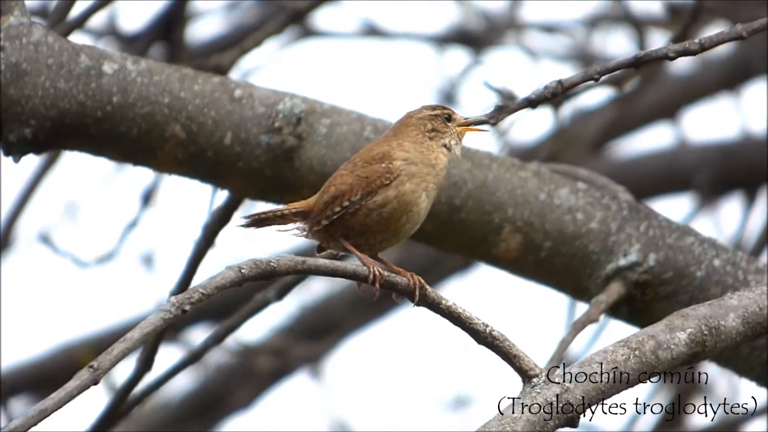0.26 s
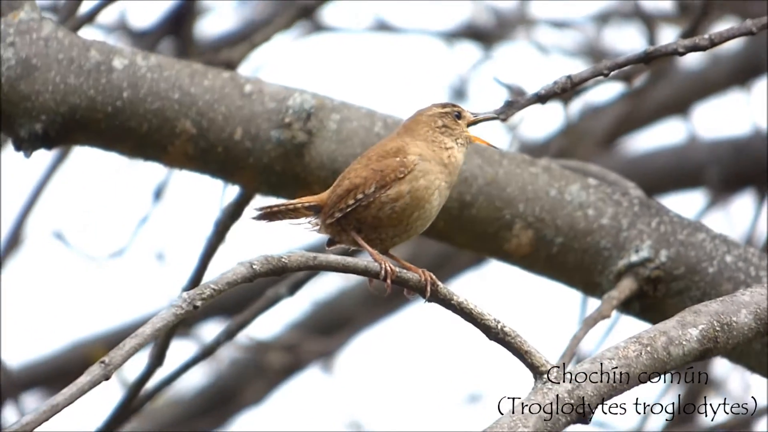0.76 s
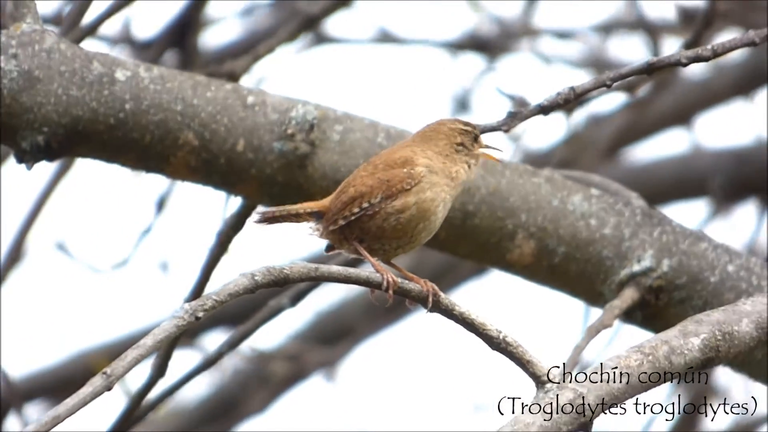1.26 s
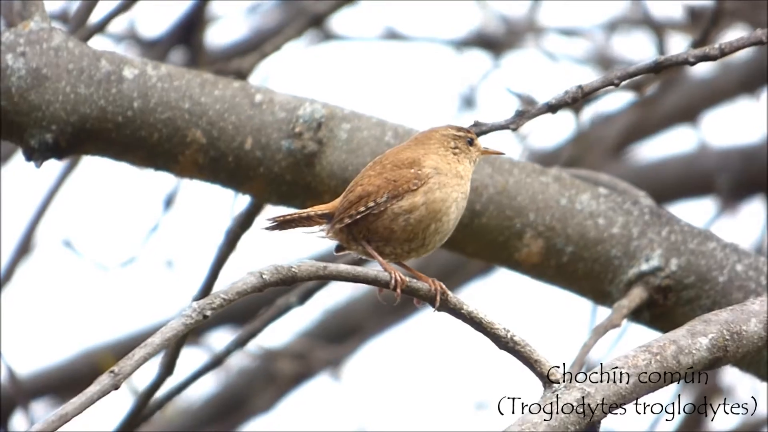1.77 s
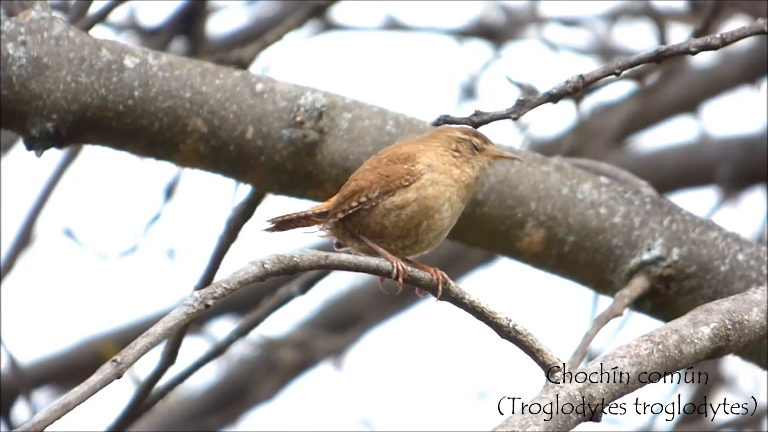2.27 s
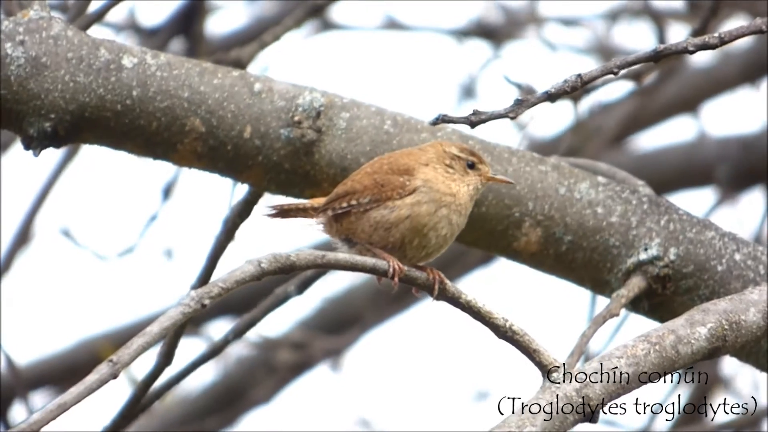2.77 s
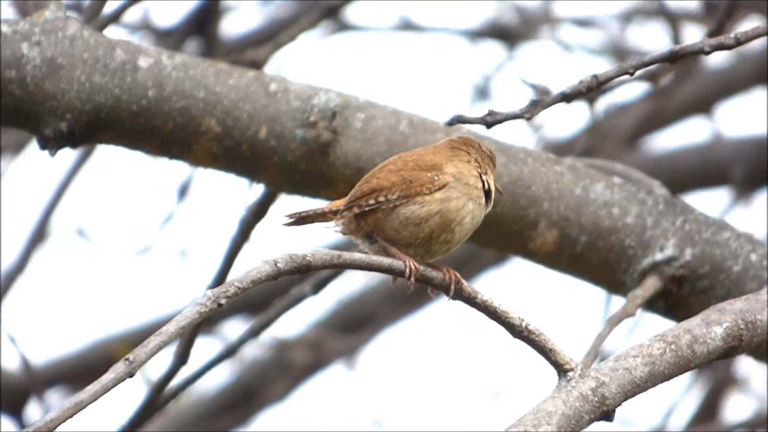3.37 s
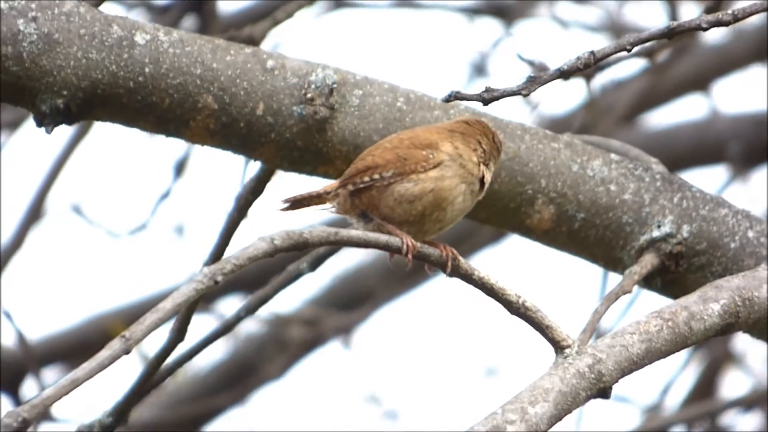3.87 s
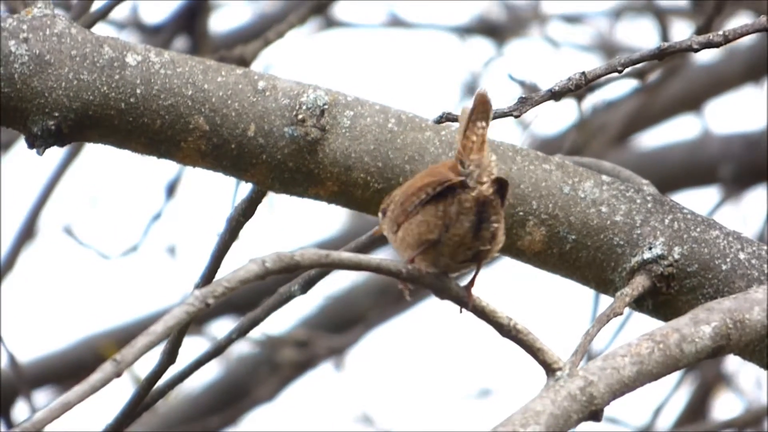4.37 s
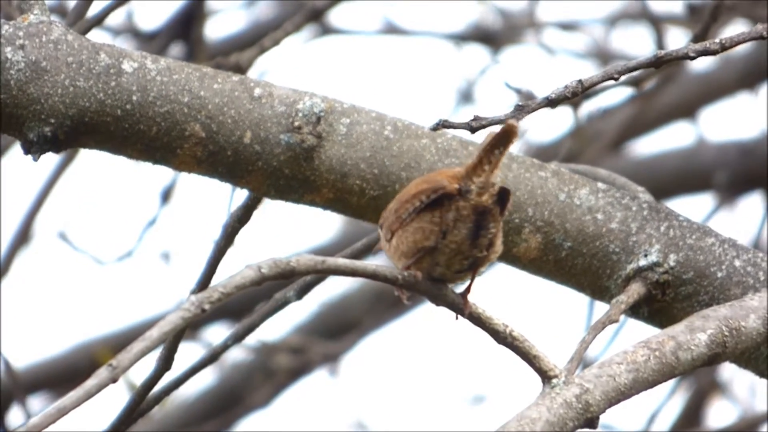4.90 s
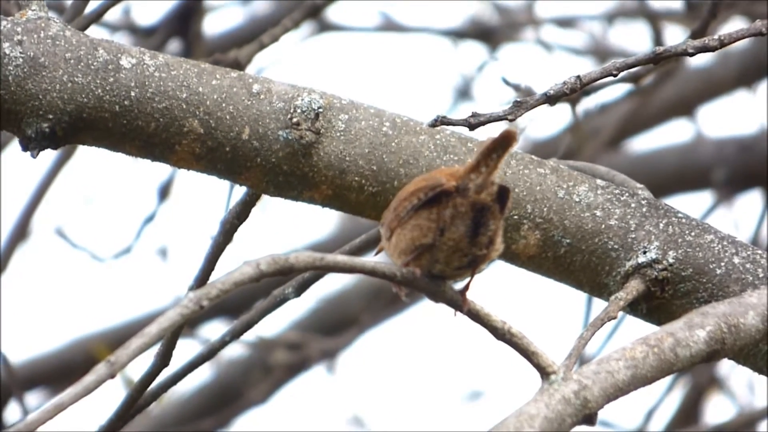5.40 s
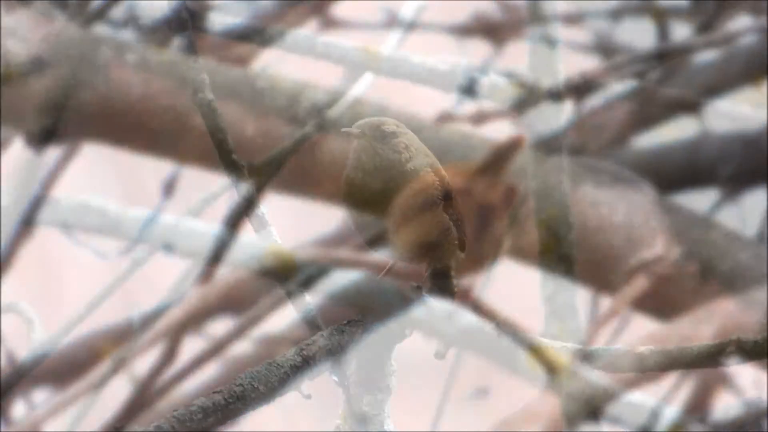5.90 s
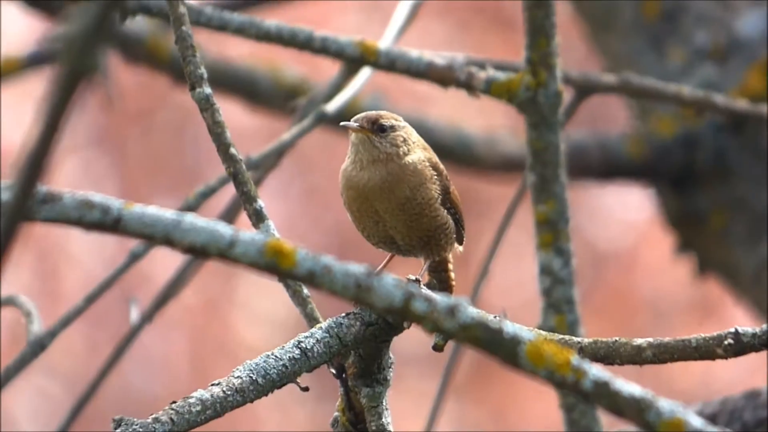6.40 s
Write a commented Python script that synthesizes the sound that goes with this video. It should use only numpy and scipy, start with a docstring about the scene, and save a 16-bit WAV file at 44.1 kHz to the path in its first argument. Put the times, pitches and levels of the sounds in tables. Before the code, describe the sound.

A wren close by sings a loud fast trill and ringing down-slurred notes, then softer twitters, chatter and whistles answer from farther off among trees.

```python
"""Among bare branches a wren sings close by: a tick trill, a hook and eight loud down-slurs, with three faint ones much later.
Softer wren phrases follow on the left, thin twitters and a harsh chatter on the right, and mellow whistles farther off.
The singers are swept, nearly pure tones with a faint octave; the chatter is noise bursts through a broad throat.
Sparse decaying echoes scatter every note. Resonant noise makes a faint distant hum, which swells late and then drops."""
import sys
import numpy as np
from scipy import signal
from scipy.fft import rfft, irfft
from scipy.io import wavfile
from scipy.ndimage import uniform_filter1d

SR = 44100
rng = np.random.default_rng(int(sys.argv[2]) if len(sys.argv) > 2 else 0)


def materialize(psi):
    """Save the field psi as 16-bit PCM at rate SR to the path in sys.argv[1].

    A 1-D psi becomes a single channel; in a 2-D psi each row is a channel.
    """
    bounded = np.clip(np.atleast_2d(psi).T, -1, 1)
    quanta = np.round(bounded * 32767).astype(np.int16)
    wavfile.write(sys.argv[1], SR, quanta)


N = 293265


def amp(db):
    """Decibel law: 20 dB is a tenfold amplitude."""
    return 10 ** (np.asarray(db) / 20)


def evened(x):
    """Normalization to unit root-mean-square."""
    return x / np.sqrt(np.mean(x ** 2) + 1e-20)


def colour(x, points):
    """Linear filtering: a spectrum of (f/Hz, level/dB) points, joined on a log-frequency axis."""
    hz, db = np.transpose(points)
    bins = np.fft.rfftfreq(x.shape[-1], 1 / SR)
    gain = amp(np.interp(np.log(bins + 1), np.log(hz + 1), db))
    return irfft(rfft(x) * gain, x.shape[-1])


def noise(points):
    """Coloured noise: a white spectrum shaped by a filter, at unit strength."""
    return evened(colour(rng.standard_normal(N), points))


def level(curve):
    """Amplitude envelope: (t/s, level/dB) points joined by straight lines in dB."""
    return amp(np.interp(np.arange(N) / SR, *np.transpose(curve)))


def pan(db):
    """Interaural level difference: left minus right in dB, with the mean gain kept at one."""
    gains = amp([[db / 2], [-db / 2]])
    return gains / gains.mean()


def add(mix, s, sound):
    """Superposition: adds a sound in place, starting at s seconds."""
    part = mix[..., max(round(s * SR), 0):][..., :sound.shape[-1]]
    part += sound[..., :part.shape[-1]]


def waver(count, size):
    """Random modulation: noise smoothed twice over size samples, at unit strength."""
    smooth = uniform_filter1d(rng.standard_normal(count), size)
    return evened(uniform_filter1d(smooth, size))


def background(apart=0.51):
    """Resonance of noise: a distant drone in a few bands, over a dull wash and a faint hiss."""
    # resonances of the drone: (f/Hz, width/Hz, relative level/dB, left-right/dB)
    resonances = [(231, 154, -68, 0), (367, 24, -67.5, -2), (417.4, 54, -62.5, 6.5), (465.2, 26, -67, 7),
                  (656, 59, -62, 6), (762, 70, -62, 5), (895.5, 52, -64, -15), (951, 34, -61, -2),
                  (1034, 150, -60, -7.5), (1110, 40, -69.5, -2.5), (1220, 65, -69.5, 6),
                  (1383, 17, -63.5, 5)]
    # course of drone and wash: (t/s, gain/dB)
    hum_level = [(0, 3), (1.3, 2.5), (2.5, 1.5), (3.2, 2.5), (5.7, 1.5), (5.96, 4.5), (6.37, 6),
                 (6.41, 1.5)]
    # spectrum of the dull wash: (f/Hz, relative level/dB)
    wash_colour = [(10, 15), (45, -11.5), (100, -20), (170, -4.5), (550, -5.5), (1500, -8.5), (2500, -22.5),
                   (5000, -39)]
    # spectrum of the hiss: (f/Hz, relative level/dB)
    hiss_colour = [(900, -18), (1800, -4.5), (3000, -2.5), (6000, -5), (10000, -11), (15000, -22.5)]
    opposed_hz = 580  # resonances above this reach the two sides in opposite phase
    hz = np.fft.rfftfreq(N, 1 / SR)
    drone = np.zeros((2, N))
    for centre, width, db, side_db in resonances:
        response = 1 / (1 + (1.48 * (hz - centre) / width) ** 2)
        band = evened(irfft(rfft(rng.standard_normal(N)) * response, N))
        sides = np.array([band, np.sign(opposed_hz - centre) * band])
        drone += amp(db) * pan(side_db) * sides
    # one part of the wash is common to both sides, the other is independent
    wash = noise(wash_colour) + apart * np.array([noise(wash_colour), noise(wash_colour)])
    hiss = np.array([noise(hiss_colour), noise(hiss_colour)])
    return level(hum_level) * (drone + amp(-61) * wash) + amp(-59.5) * hiss


def trees(x, near_db, far_db, near_t60, far_t60, same, echoes_per_s=4000):
    """Multiple scattering: nearby twigs scatter quickly and the wood rings on, with tails partly shared."""
    t = np.arange(SR) / SR
    taps = rng.standard_normal((3, SR)) * (rng.random((3, SR)) < echoes_per_s / SR)
    # same is the share of tail power that both sides hear alike
    taps = np.sqrt(same) * taps[2] + np.sqrt(1 - same) * taps[:2]
    onset = 1 - np.exp(-t / 0.0029)
    near = amp(near_db) * evened(amp(-60 * t / near_t60) * onset)
    far = amp(far_db) * evened(amp(-60 * t / far_t60) * onset)
    tail = evened(taps * np.hypot(near, far)) / np.sqrt(SR)  # unit energy
    tail *= np.hypot(amp(near_db), amp(far_db))
    return x + signal.fftconvolve(x, tail, axes=1)[:, :N]


def trunks(x):
    """Specular reflection: a few distinct, dulled echoes from trunks and ground."""
    # single reflections: (delay t/s, gain)
    reflections = [(.0036, 0.19), (0.0106, 0.14), (.035, 0.14), (.047, 0.075)]
    # spectrum of the echoes: (f/Hz, level/dB)
    echo_colour = [(4500, 9), (5400, 2.5), (6400, -6), (7600, 2)]
    out, echo = x.copy(), colour(x, echo_colour)
    for delay, gain in reflections:
        add(out, delay, gain * echo)
    return out


def syrinx(hz, gain, jitter=0.0036, overtone_db=-45, attack_db=0, attack_s=0.0062):
    """Frequency modulation: a trembling, nearly pure tone; attack_db lifts its faint octave at the onset."""
    t = np.arange(len(hz)) / SR
    trembling_hz = hz * (1 + jitter * waver(len(hz), size=40))
    phase = 2 * np.pi * np.cumsum(trembling_hz) / SR
    octave = amp(overtone_db + attack_db * np.exp(-t / attack_s))
    return np.sqrt(2) * gain * (np.sin(phase) + octave * np.sin(2 * phase))


def plain_note(s, length, first, last, db, soft_share=0.27, swell_db=2):
    """Gliding tone: start, pitch and gain of a whistle that swells as it settles on its last pitch."""
    u = np.linspace(0, 1, int(length * SR))
    pitch = last + (first - last) * (1 - u) ** 1.7  # fast at first, then settling
    gain = amp(db + swell_db * (u - .5)) * signal.windows.tukey(len(u), soft_share)
    return s, pitch, gain


def winding_note(curve, gain_db=0.5, fade_s=0.0047):
    """Piecewise-linear glide: start, pitch and gain of a whistle that follows its own curve."""
    s, hz, db = np.transpose(curve)
    t = np.arange(s[0], s[-1], 1 / SR)
    fade = np.minimum(np.minimum(t - s[0], s[-1] - t) / fade_s, 1)
    return s[0], np.interp(t, s, hz), amp(gain_db + np.interp(t, s, db)) * fade


def faint_chirps(db=-52, per_s=10, low_hz=4300, high_hz=6200, sweep=0.21, length_s=0.0204):
    """Upward chirp: short, quiet notes at chance pitches, each gliding up, during the chatter."""
    out = np.zeros(N)
    times = np.arange(3.14, 4.05, 1 / per_s)
    for s, (late, height, slope) in zip(times, rng.random((len(times), 3))):
        hz = low_hz + (high_hz - low_hz) * height
        start = s + late / per_s / 2
        start, pitch, gain = plain_note(start, length_s, hz * (1 - sweep * slope), hz, db)
        add(out, start, syrinx(pitch, gain))
    return out


def whistles(wander=0.0077, flutter_db=0.5):
    """Slow modulation: whistles from several perches, a little unsteady in pitch and strength."""
    # where each perch lies and how bright its singer is: (left-right/dB, octave overtone level/dB)
    perches = {"right": (-5.5, -40), "middle": (-1.2, -28), "left": (3.4, -32), "far right": (-15, -24.5)}
    # plain whistles, by perch: (start t/s, length t/s, first f/Hz, last f/Hz, level/dB)
    plain_rows = { "right": [(1.18, 0.068, 3480, 2750, -62), (1.392, 0.097, 3320, 3496, -54),
                  (1.6, 0.047, 4460, 5300, -48.5), (1.793, 0.013, 4020, 6820, -54),
                  (1.805, 0.47, 6720, 6730, -71), (1.836, 0.035, 3280, 3000, -55),
                  (1.876, .033, 2680, 3080, -57), (1.98, 0.057, 5950, 5630, -50),
                  (2.612, 0.042, 4096, 4144, -42), (2.657, .047, 4260, 4320, -50),
                  (2.88, 0.12, 1900, 2447, -59), (3.027, 0.051, 3780, 3030, -48),
                  (3.196, 0.038, 2815, 2930, -50), (3.401, 0.061, 4410, 3900, -41),
                  (3.478, 0.079, 3625, 3490, -46.5), (3.655, .043, 3050, 3003, -45.5),
                  (3.764, 0.074, 4020, 3100, -48.5)], "middle": [(.394, 0.04, 3730, 4220, -41.5),
                  (.42, 0.018, 4050, 4540, -39), (3.366, 0.071, 5620, 7210, -38.5),
                  (6.342, 0.039, 3120, 2644, -46), (6.35, .023, 3150, 3620, -50.5)],
                  "left": [(1.399, 0.041, 4640, 4530, -44.5), (3.265, .08, 5550, 4940, -49.5),
                  (4.011, .022, 3760, 4330, -50.5), (4.225, 0.06, 3630, 3630, -50),
                  (4.602, 0.031, 4460, 4930, -46), (4.715, 0.023, 3750, 4170, -49.5),
                  (4.766, 0.077, 5970, 5720, -48), (4.945, .034, 4480, 4200, -50),
                  (4.977, .035, 4700, 3450, -42.5), (5.007, 0.0236, 3580, 2890, -50),
                  (5.323, 0.062, 2940, 3010, -49), (5.384, 0.048, 3040, 3186, -44),
                  (5.488, 0.0466, 4170, 3520, -42), (5.596, 0.07, 3320, 4030, -41),
                  (5.636, 0.025, 5650, 4350, -38), (5.651, .047, 3850, 3020, -49.5),
                  (5.712, 0.039, 5260, 5100, -37.5), (6.015, .025, 2590, 4100, -51)],
                  "far right": [(3.022, .027, 8100, 7240, -38.5), (3.215, 0.015, 7420, 7400, -37.5),
                  (3.241, 0.013, 5200, 5450, -39.5), (3.332, 0.0148, 8130, 7600, -42.5),
                  (3.375, .06, 6730, 7290, -38.5), (3.71, .025, 4730, 6000, -47)]}
    # long winding whistles, by perch, one curve each: (t/s, f/Hz, relative level/dB)
    winding_curves = { "right": [[(2.2, 5170, -47), (2.238, 4110, -47), (2.302, 3690, -46.5),
                      (2.374, 2615, -58), (2.406, 2837, -66), (2.42, 2596, -61.5), (2.518, 3270, -46.5),
                      (2.538, 3655, -45.5), (2.557, 3650, -46)]], "left": [[(5.457, 8020, -51),
                      (5.471, 7650, -47.5), (5.495, 7890, -42.5), (5.525, 7800, -40), (5.555, 7660, -49)],
                      [(5.808, 6300, -43), (5.836, 5630, -36), (5.862, 5540, -51), (5.878, 5250, -38),
                      (5.902, 4833, -41), (5.945, 4610, -39)], [(6.03, 4060, -48), (6.06, 3970, -37.5),
                      (6.094, 3995, -37), (6.125, 4220, -39.5)], [(6.19, 4230, -48), (6.206, 4070, -36),
                      (6.22, 3400, -44), (6.256, 3020, -45.5), (6.272, 2970, -42)]]}
    out = np.zeros((2, N))
    drift = 1 + wander * waver(N, size=260)
    flutter = amp(flutter_db * waver(N, size=200))
    for perch, (side_db, overtone_db) in perches.items():
        notes = [plain_note(*row) for row in plain_rows[perch]]
        notes += [winding_note(curve) for curve in winding_curves.get(perch, [])]
        for s, pitch, gain in notes:
            now = int(s * SR) + np.arange(len(pitch))
            tone = syrinx(pitch * drift[now], gain * flutter[now], jitter=0.0067, overtone_db=overtone_db)
            add(out, s, pan(side_db) * tone)
    return out


def chatter(rise_s=0.02, grain_db=3):
    """Source and filter: hoarse, grainy bursts of noise through a broad throat."""
    # bursts: (start t/s, level/dB)
    bursts = [(3.067, -47.5), (3.162, -44), (3.253, -45), (3.363, -46.5), (3.484, -48), (3.603, -46),
              (3.752, -45.5), (3.893, -46), (4.008, -47)]
    # resonance of the throat: (f/Hz, relative level/dB)
    throat = [(900, -13), (1600, -5.5), (2200, 0), (2700, 6.5), (3200, -0.5), (4200, -11.5), (6500, -6),
              (9000, -16), (15000, -37)]
    gain = np.zeros(N)
    u = np.arange(SR // 2) / SR / rise_s
    pulse = (u * np.exp(1 - u)) ** 2  # peaks at one after rise_s
    for s, db in bursts:
        add(gain, s, amp(db) * pulse)
    grain = evened(amp(grain_db * waver(N, size=120)))
    return gain * noise(throat) * grain


def rasp(per_s=190, low_hz=6400, high_hz=8400, sweep=0.132, spread_db=3.0, overtone_db=-19):
    """Granular sound: bursts of tiny squeaks, each sweeping up or down; a burst swells and fades."""
    # scratchy bursts between the twitters: (start t/s, length t/s, relative level/dB)
    bursts = [(3.059, 0.062, -44), (3.215, 0.055, -46), (3.32, .04, -49), (3.467, 0.13, -42),
              (3.612, 0.067, -33.5), (3.732, 0.055, -48), (3.878, 0.059, -44)]
    # spectrum of the squeaks: (f/Hz, level/dB)
    squeak_colour = [(3500, -15), (5200, -10), (7500, 1.5), (8900, 2), (10000, 18), (14300, -3),
                     (15800, -12)]
    out = np.zeros(N)
    for start, length, burst_db in bursts:
        times = np.arange(0, length, 1 / per_s)
        for s, (late, span, height, slope, size) in zip(times, rng.random((len(times), 5))):
            u = np.linspace(-1, 1, int((0.0038 + 0.00575 * span) * SR))
            centre_hz = low_hz + (high_hz - low_hz) * height
            hz = centre_hz * (1 + sweep * np.sign(slope - .5) * u)
            swell = np.sin(np.pi * s / length)
            gain = amp(burst_db + spread_db * (2 * size - 2.5)) * swell * np.cos(np.pi * u / 2)
            add(out, start + s + (late - 1) / per_s, syrinx(hz, gain, overtone_db=overtone_db))
    return colour(out, squeak_colour)


def beads():
    """Amplitude modulation: a slowly rising tone chopped into tiny pips."""
    # trills: (start t/s, length t/s, first f/Hz, last f/Hz, level/dB, beads per s)
    trills = [(5.124, 0.1, 3510, 4160, -49, 110), (5.284, 0.11, 3570, 3830, -51, 97)]
    out = np.zeros(N)
    for s, length, first, last, db, rate in trills:
        t = np.arange(int(length * SR)) / SR
        gain = amp(db) * np.sin(np.pi * rate * t) ** 2
        add(out, s, syrinx(np.linspace(first, last, len(t)), gain))
    return out


def song(phrases, jitter, overtone_db, attack_db, sag=0):
    """Periodic repetition: each phrase repeats one syllable; growth drifts the pace, sag lowers the pitch."""
    # syllable shapes: (share of the length, f/Hz, relative level/dB)
    shapes = { "tick": [(0, 7100, -9), (.55, 5800, 0), (1, 4400, -8)], "hook": [(0, 6770, -15),
              (.2, 7920, -4), (.4, 8010, -1), (.75, 7240, -0.5), (1, 7220, -12)], "slur": [(0, 5400, -12),
              (.04, 6750, -8.5), (.09, 7450, -10.5), (.19, 7620, -11.5), (.33, 7290, -10),
              (.56, 6860, -1.5), (.68, 6300, 0), (.8, 5350, -3.5), (.91, 4880, -10.5), (1, 4560, -21)],
              "chip": [(0, 8020, -7), (.5, 5960, -5.5), (1, 5200, -7.5)], "tip": [(0, 8400, 1),
              (1, 7440, 5)], "flick": [(0, 6450, -7), (.6, 7430, -6), (1, 9460, -5)],
              "droop": [(0, 5870, -6), (.1, 6770, -5.5), (.4, 6640, 0), (.72, 6280, -1), (.88, 5450, 2),
              (1, 5060, -1)], "scoop": [(0, 6500, -17), (.2, 5250, -0.5), (.48, 4366, -4.5),
              (.63, 4960, -4), (.74, 7100, -14.5), (.88, 6840, -8.5), (1, 6330, -9.5)],
              "arch": [(0, 6200, -11), (.15, 7560, -6), (.35, 8070, -3.5), (.72, 7300, -1.5),
              (.88, 5800, 1), (1, 5300, -2)], "rise": [(0, 4220, -5), (.4, 4730, 0), (.8, 5300, -3.5),
              (1, 6050, -23)], "sigh": [(0, 6040, -29), (.12, 7800, -8.5), (.4, 7420, -14.5),
              (.7, 7190, -3.5), (.92, 6400, -5), (1, 6280, 4.5)]}
    # chance spread in strength between repeats of the quick syllables: level/dB
    uneven_db = {"tick": 1.6, "chip": 1.4, "tip": 1.8, "flick": 2.2}
    out = np.zeros(N)
    for name, count, start, period, growth, length, level_db in phrases:
        share, hz, db = np.transpose(shapes[name])
        u = np.linspace(0, 1, int(length * SR))
        pitch = uniform_filter1d(np.interp(u, share, hz), len(u) // 10, mode="nearest")
        fade = signal.windows.tukey(len(u), .004 / length)  # 2 ms at each end
        gain = amp(level_db + np.interp(u, share, db)) * fade
        for repeat in range(count):
            s = start + repeat * (period + growth * (repeat - 1) / 2)
            strength = amp(uneven_db.get(name, 0) * rng.standard_normal())
            note = syrinx(pitch * (1 - sag * repeat), strength * gain, jitter, overtone_db, attack_db)
            add(out, s, note)
    return out


def twitter():
    """Rapid repetition: thin chips and flicks on the right, with scratchy bursts between."""
    # phrases: (syllable, repeats, start t/s, period t/s, growth of the period t/s,
    # syllable length t/s, relative level/dB)
    phrases = [ ("flick", 4, 2.574, 0.031, 0, 0.015, -46.5), ("flick", 4, 2.707, .035, 0, .012, -40.5),
               ("chip", 7, 2.624, .0349, 0, 0.011, -37.5), ("chip", 7, 2.892, 0.018, 0, 0.014, -36.5),
               ("tip", 7, 3.1, .0167, 0, 0.0078, -45), ("chip", 2, 3.09, .012, 0, .012, -30.5),
               ("flick", 2, 3.203, 0.035, 0, .012, -36), ("chip", 2, 3.309, .02, 0, .008, -40),
               ("chip", 2, 3.507, 0.0045, 0, .005, -34.5), ("chip", 2, 3.547, 0.023, 0, 0.0082, -34),
               ("chip", 1, 3.75, 0, 0, 0.0079, -32.5)]
    return pan(db=-12.0) * (song(phrases, jitter=0.0085, overtone_db=-29, attack_db=8) + rasp())


def far_wren():
    """Repeated frequency sweeps: the softer wren phrases on the left, with beaded trills."""
    # phrases: (syllable, repeats, start t/s, period t/s, growth of the period t/s,
    # syllable length t/s, relative level/dB)
    phrases = [ ("droop", 3, 3.574, .142, 0, .1, -39.5), ("scoop", 2, 4.083, .241, 0, .085, -34),
               ("tick", 11, 4.47, 0.033, 0, .007, -49), ("arch", 1, 4.78, 0, 0, .12, -39.5),
               ("rise", 3, 5.037, 0.178, -.011, 0.029, -34.5),
               ("sigh", 5, 5.793, 0.1174, .003, 0.081, -34.5)]
    return pan(db=5.5) * (song(phrases, jitter=0.0055, overtone_db=-44, attack_db=8) + beads())


def wren():
    """Direct sound and early reflections: the near wren in the centre, its pitch sagging along a series."""
    # phrases: (syllable, repeats, start t/s, period t/s, growth of the period t/s,
    # syllable length t/s, relative level/dB)
    phrases = [ ("tick", 11, .0166, .0259, 0, 0.0064, -29.5), ("hook", 1, .305, 0, 0, 0.054, -25.5),
               ("slur", 8, 0.4765, 0.10983, .0011, .071, -19), ("slur", 3, 6.228, .143, 0, .061, -54)]
    return pan(db=0.0) * trunks(song(phrases, jitter=0.0018, overtone_db=-43.5, attack_db=23, sag=0.00227))


def scene():
    """Superposition: the background, the distant singers and the near wren, each group with its own scattering."""
    mellow = whistles() + pan(db=-10) * faint_chirps()
    harsh = pan(db=-4.5) * chatter()
    distant = trees(mellow, near_db=-4.5, far_db=-7, near_t60=0.26, far_t60=0.98, same=0.83)
    distant += trees(harsh, near_db=-24, far_db=1.0, near_t60=0.43, far_t60=0.93, same=0.6)
    distant += trees(twitter(), near_db=-5.5, far_db=-2.5, near_t60=.2, far_t60=0.43, same=0.11,
                     echoes_per_s=500)
    distant += trees(far_wren(), near_db=-10, far_db=-11, near_t60=0.22, far_t60=0.72, same=0.87)
    # the layer of distant singers, with its echoes, is cut off at 6.38 s
    distant *= np.clip((6.38 - np.arange(N) / SR) / 0.0022, 0, 1)
    close = trees(wren(), near_db=-7.5, far_db=-14, near_t60=0.19, far_t60=0.58, same=0.65, echoes_per_s=450)
    return background() + distant + close


def record(dry):
    """Band limitation: a linear-phase low-pass filter at 15750 Hz."""
    low_pass = signal.firwin(511, 15750, window=("kaiser", 9), fs=SR)
    return signal.oaconvolve(dry, low_pass[None], "same")


dry = scene()
out = record(dry)
materialize(out)
```